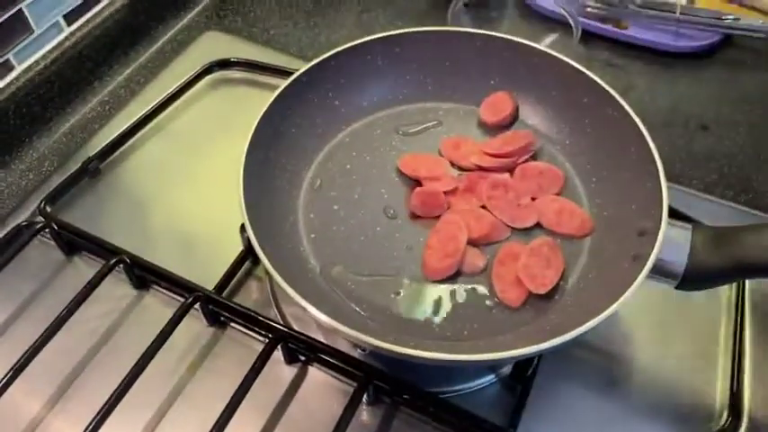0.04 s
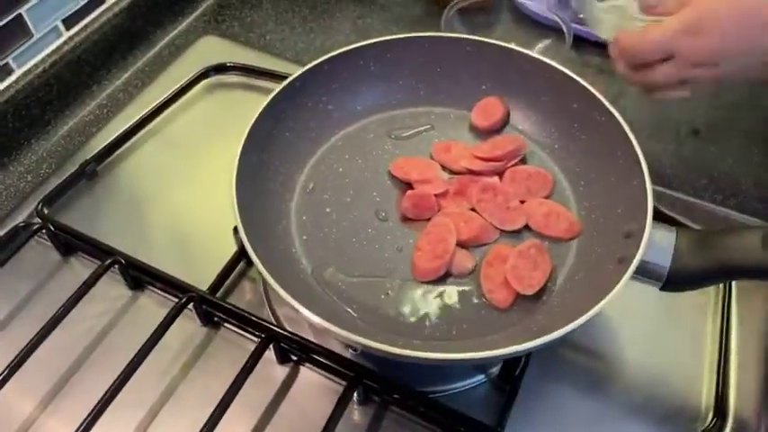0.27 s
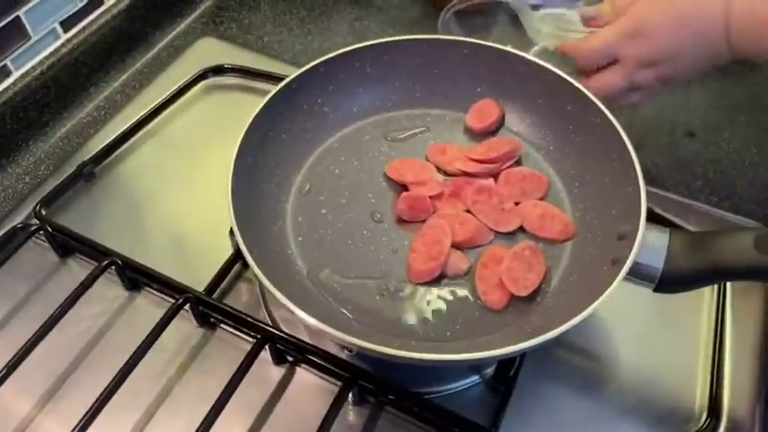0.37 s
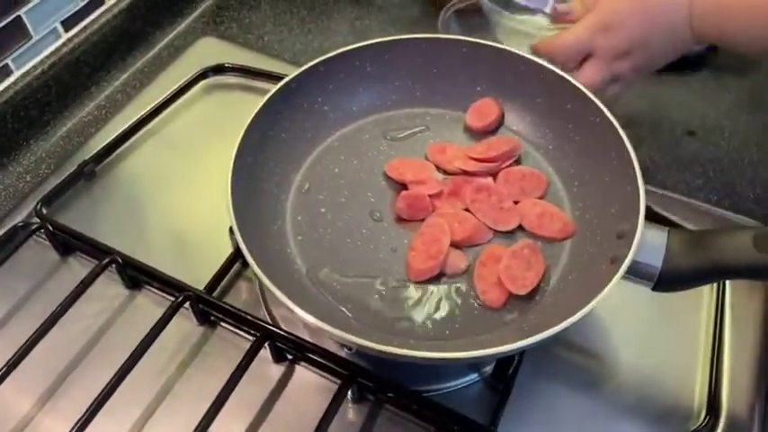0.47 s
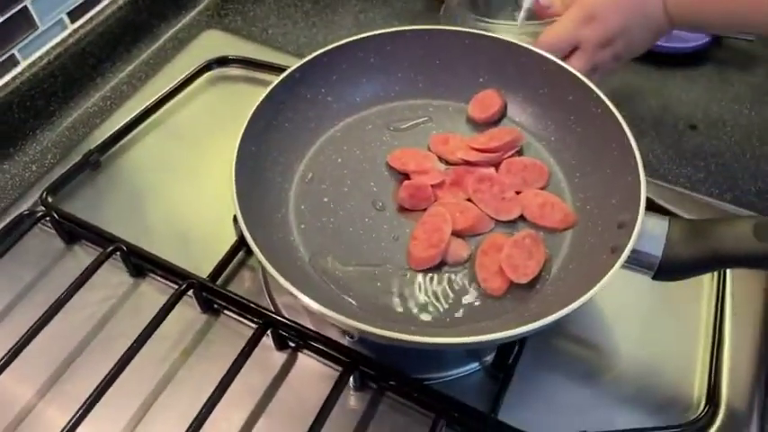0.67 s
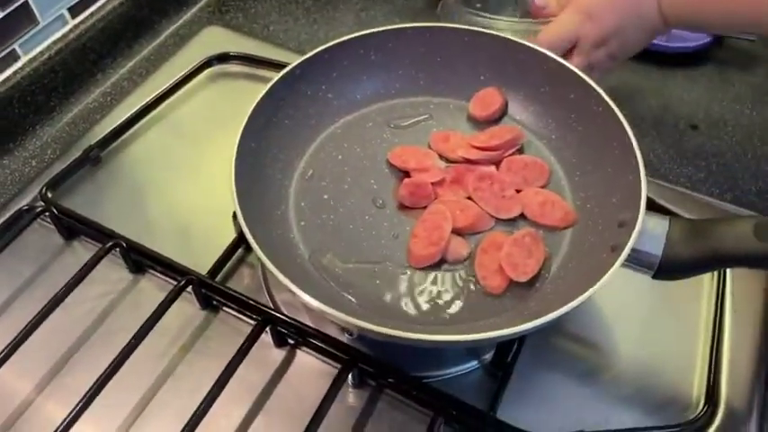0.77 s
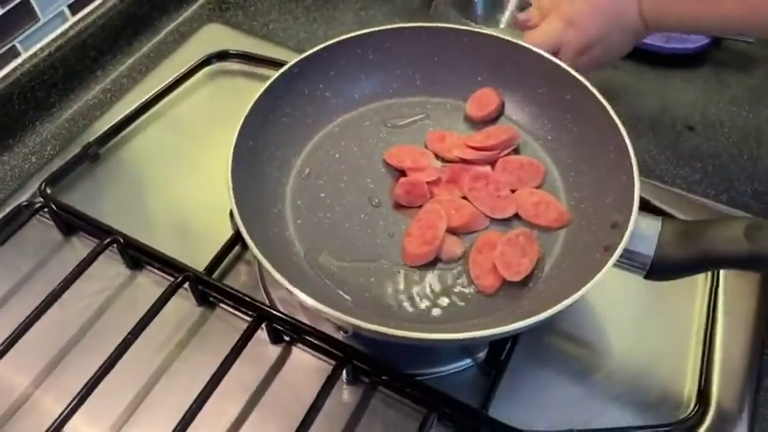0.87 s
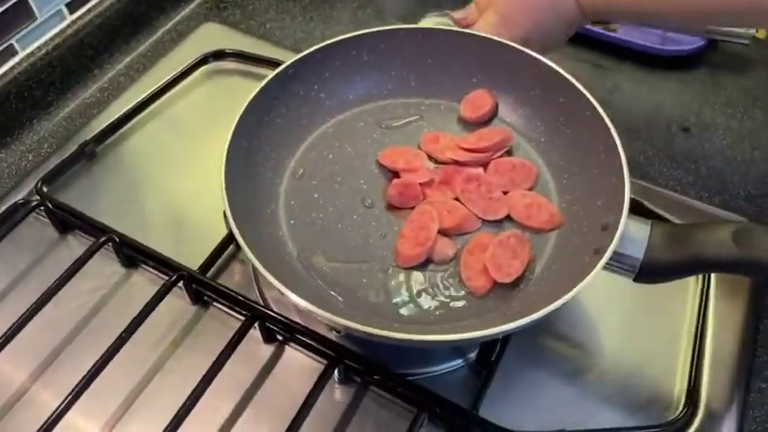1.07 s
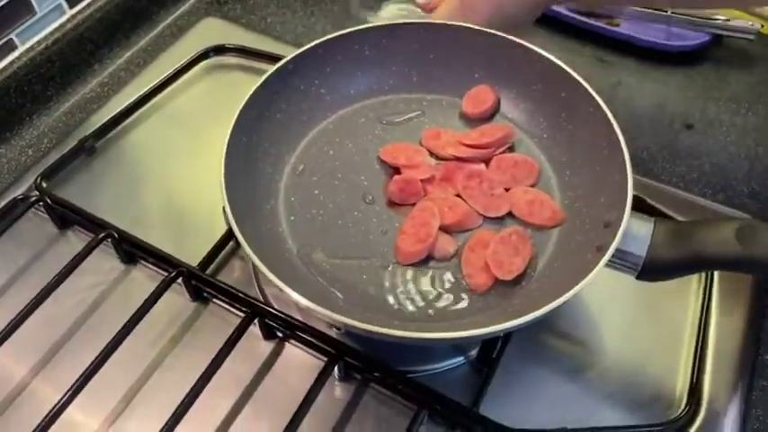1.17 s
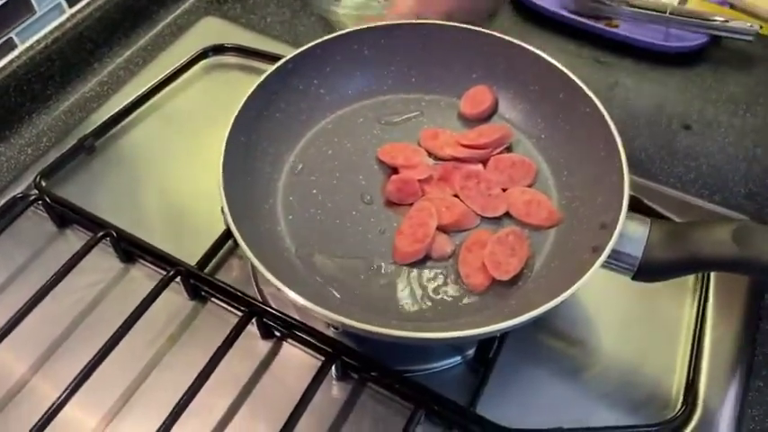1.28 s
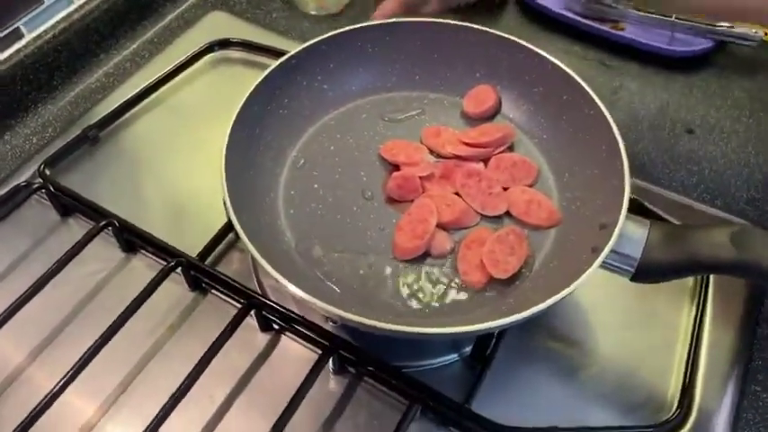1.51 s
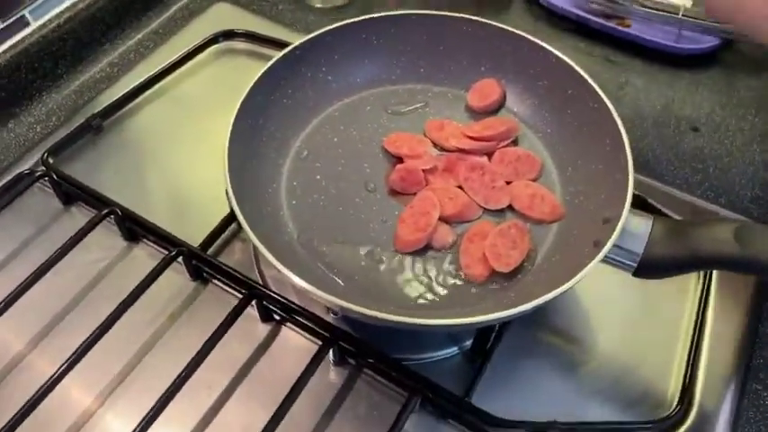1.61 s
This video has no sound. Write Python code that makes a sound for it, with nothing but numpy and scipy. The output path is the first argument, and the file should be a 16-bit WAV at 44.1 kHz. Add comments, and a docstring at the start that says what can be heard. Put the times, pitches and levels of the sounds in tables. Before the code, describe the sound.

Sausage slices sizzle in hot fat with sharp pops while glass bowls clink behind the pan

```python
"""Sizzling pan and glass bowls

Sausage slices sizzle in hot fat in a pan on a gas hob, close to a phone: random tiny bursts over a hiss.
Single drops pop, loud and faint, as clicks that ring for a moment, and steam spits in short swells of noise.
Behind the pan a hand stacks two small glass bowls: shaped noise makes the knocks, rattles and scrapes, and
fading sine waves make the glass ring. Steady noise and a wavering low tone make the kitchen's hum."""
import sys
import numpy as np
from scipy import signal
from scipy.fft import rfft, irfft
from scipy.io import wavfile
from scipy.ndimage import uniform_filter1d

SR = 44100
rng = np.random.default_rng(int(sys.argv[2]) if len(sys.argv) > 2 else 0)


def transcribe(u):
    """Save the signal u as a 16-bit wav file named by the first command-line argument.

    u: samples, shape (n,) or (channels, n), limited to [-1, 1]; the rate is SR.
    q: integer samples, one column per channel.
    """
    v = np.clip(np.atleast_2d(u).T, -1, 1)
    q = np.round(v * 32767).astype(np.int16)
    wavfile.write(sys.argv[1], SR, q)


def ratio(d):
    """dB to gain"""
    e = np.asarray(d, float) / 20
    return 10 ** e


N = 72765  # length in samples

# Loudness of the sizzle's treble before its flicker: start_s, level_db
SIZZLE_LEVEL = [(0.0, -30.5), (0.386, -29), (0.886, -30), (1.034, -33.5), (1.65, -32.5)]
# Tone of the sizzle: pitch_hz, relative level_db (per hertz)
SIZZLE_TONE = [(1060, -43), (1800, -17), (2640, -7), (3440, -2.5), (5960, 1), (6900, 0), (8200, -3.5),
               (9240, -2), (12400, -4), (16000, -9.5)]
# Centre pitches of the bubble bursts, small bubbles higher: pitch_hz
BUBBLE_PITCHES = [4500, 7000, 10000, 14000]
# Tone of the kitchen's steady noise: pitch_hz, relative level_db (per hertz)
KITCHEN_TONE = [(15, -40), (25, -9), (64, -21), (100, 2), (130, -16.5), (231, -10.5), (338, -21.5),
                (616, -13.5), (939, -5), (3000, -12.5), (3900, -44)]
# Loudness of a low rush at about 300-700 Hz: start_s, level_db
LOW_RUSH = [(0, -68), (1.15, -65), (1.4, -50), (1.65, -42)]
# Single pops of fat, loud and faint: start_s, relative level_db
FAT_POPS = [(.0077, -11), (.0948, -7), (.139, -12), (0.2611, -4.5), (0.3654, 1), (0.3832, -12), (0.47, -19),
            (0.5011, -2.5), (.535, -8), (.5674, -12), (0.6082, -7), (0.6177, 5), (0.6316, -15), (0.69, -11),
            (0.762, -1), (0.9698, -0.5), (1.1166, -17), (1.2036, -0.5), (1.2142, -33), (1.2382, -5),
            (1.288, -3), (1.3035, -38), (1.476, -22), (1.4932, -15), (1.5052, -17), (1.5185, -18),
            (1.5285, -12), (1.579, -8), (1.429, -13), (1.347, -7), (1.3667, -13), (.4428, -17),
            (.6625, -20), (.2218, -11), (0.1, -9)]
# Ringing of every pop: pitch_hz, width_hz, relative level_db
POP_RINGING = [(6170, 2970, 5), (8730, 3000, 3.5), (12000, 4600, -4)]
# Longer spits of steam: start_s, length_s, level_db, pitch_hz
STEAM_SPITS = [(0.02, 0.004, -18.5, 6400), (0.229, 0.019, -22.5, 12000), (0.963, 0.03, -24, 5000),
               (1.511, 0.021, -27.5, 4440)]
# Knocks of the bowls, and a faint touch (at 0.731 s) that damps the ringing:
# start_s, thud_db, dull_knock_db, bright_rattle_db, fade_s (by 60 dB),
# ring_share (of the free ringing time), ring_1_db, ring_2_db, ring_3_db, ring_4_db (one per overtone)
BOWL_TOUCHES = [(0.6991, -19.5, -4.5, -4, 0.054, 0.55, -38, -19, -14, -14.5),
                (.731, -52, -34, -38, 0.036, 0.71, -23, -50, -54, -42),
                (.7425, -45, -37, -32, .04, 0.88, -30, -45, -29, -40),
                (0.7543, -33.5, -16.5, -23, 0.015, 0.88, -22.5, -29.5, -47, -48),
                (.779, -26, -15.5, -39, 0.033, 0.78, -29.5, -49, -44, -36),
                (.88, -29.5, -10, 0.5, 0.055, 0.83, -31.5, -15.5, -13, -17.5),
                (1.0278, -24, -11.5, -4, 0.094, 1.0, -34, -12, -9, -10),
                (1.043, -24.5, -15.5, -12, 0.038, .8, -16, -10, -12.5, -17.5),
                (1.053, -63, -14, -13, 0.023, 0.39, -23, -15, -15, -18.5),
                (1.083, -59, -41, -19, 0.086, 0.89, -35, -26, -29, -28),
                (1.116, -50, -39, -20.5, 0.046, 0.61, -46, -35, -33, -27)]
# Scrapes and clatter of a bowl, without ringing:
# start_s, thud_db, dull_knock_db, bright_rattle_db, fade_s (by 60 dB)
SCRAPES = [(1.2027, -57, -37, -30, 0.071), (1.3332, -50, -21, -20.5, 0.1), (1.3815, -44, -27, -18, 0.057),
           (1.388, -32.5, -25, -16.5, 0.064), (1.495, -37, -31.5, -58, 0.095)]
# Tones of the three parts of a touch or scrape, each: pitch_hz, relative level_db (per hertz)
THUD_TONE = [(20, 11), (60, -16), (100, -9), (250, 5), (450, -3.5), (900, -17.5)]
DULL_TONE = [(300, -27.5), (550, -14.5), (760, -5), (930, -6.5), (1170, 1), (1400, -7), (1650, -4.5),
             (2000, -10.5), (3500, -12.5), (8000, -53)]
BRIGHT_TONE = [(1500, -35), (2300, -7), (2900, -5.5), (3450, -5), (3800, 1.5), (4300, -1.5), (4950, -7.5),
               (5600, 3.5), (6200, -1), (7400, -11.5), (8400, -4.5), (9800, -18.5), (12500, -10),
               (16000, -16)]
# Ringing tones of the glass in four groups, mostly close pairs:
# pitch_hz, relative level_db, free fade_s (by 60 dB)
GLASS_TONES = [
    [(1497, -1, .45), (1630, -4, .2)],
    [(3191, 0, .36), (3260, -8, .15), (2650, -13, .25)],
    [(5500, 2, .22), (5670, -6, .25), (5960, -8, .1)],
    [(8330, -4, .3), (8460, 0, .3), (12260, -14, .12)],
]


def set_rms(x, db):
    """Scale a sound so that its average strength (rms) is db."""
    return x * ratio(db) / np.sqrt(np.mean(x ** 2))


def colour(x, table):
    """Shape the tone of a sound along a table of pitch_hz and level_db."""
    hz = np.maximum(np.fft.rfftfreq(x.shape[-1], 1 / SR), 1)
    table_hz, table_db = np.array(table, float).T
    gain_db = np.interp(np.log(hz), np.log(table_hz), table_db)
    return irfft(rfft(x) * ratio(gain_db), x.shape[-1])


def band(x, hz, width_hz):
    """Keep mainly the pitches around hz."""
    edges = np.clip([hz - width_hz / 2, hz + width_hz / 2], 50, .45 * SR)
    return signal.sosfilt(signal.butter(1, edges, "band", fs=SR, output="sos"), x)


def walk(rate):
    """Wander smoothly between random values, with a new one rate times a second."""
    k = int(SR / rate)
    steps = rng.standard_normal(N)[np.arange(N) // k]
    return 1.19 * uniform_filter1d(uniform_filter1d(steps, k), k)


def fall(start, t60):
    """Start suddenly, then fade by 60 dB every t60 seconds."""
    t = np.arange(N) / SR - start
    return (t >= 0) * 1000. ** (-np.maximum(t, 0) / t60)


def level_over_time(table):
    """Join the points of start_s and level_db by straight lines."""
    return np.interp(np.arange(N) / SR, *np.array(table).T)


def sizzle():
    """Tiny bubbles of several sizes burst at random over a hiss; the whole flickers."""
    bursts_per_s, burst_spread_db, burst_top_db = 3000, 3.2, 12
    hiss_db, side_db = 1.5, -26  # hiss against the bursts; side noise before the mix is scaled
    flicker_db, flickers_per_s = 1.2, 40.04
    when, size, sign = rng.random((3, len(BUBBLE_PITCHES), N))
    # most bursts are small, a few are large
    size_db = np.minimum(-burst_spread_db * np.log(size + 1e-9), burst_top_db)
    happens = when < bursts_per_s / len(BUBBLE_PITCHES) / SR
    clicks = happens * np.sign(sign - .5) * ratio(size_db)
    bursts = sum(band(c, hz, 0.72 * hz) for c, hz in zip(clicks, BUBBLE_PITCHES))
    hiss, side = rng.standard_normal((2, N))
    mid = set_rms(bursts, 0) + ratio(hiss_db) * hiss
    fizz = colour(mid + ratio(side_db) * side * np.array([[1], [-1]]), SIZZLE_TONE)
    fizz = fizz / np.std(band(fizz, 10940, 6900))  # the treble sets the loudness
    return fizz * ratio(level_over_time(SIZZLE_LEVEL) + flicker_db * walk(flickers_per_s))


def kitchen():
    """Gas flame and appliances: a steady noise, a low rush that changes level and a wavering mains hum."""
    noise_db, side_db = -39.5, -24  # side_db is against the middle
    hum_hz, hum_db, waver_db = 100, -57, 5
    mid, side = set_rms(colour(rng.standard_normal((2, N)), KITCHEN_TONE), noise_db)
    hum_level = np.sqrt(2) * ratio(hum_db + waver_db * walk(4))
    hum = hum_level * np.sin(2 * np.pi * hum_hz * np.arange(N) / SR)
    rush = set_rms(band(rng.standard_normal(N), 500, 400), 0) * ratio(level_over_time(LOW_RUSH))
    return mid + rush + hum + ratio(side_db) * side * np.array([[1], [-1]])


def pops():
    """Each pop is a click that rings for a few cycles and leaves a short spray of noise."""
    spray_db, spray_t60_s = -21.5, .03  # spray_db is added to the pop's own level
    clicks, spray = np.zeros(N), np.zeros(N)
    for start, db in FAT_POPS:
        clicks[int(start * SR)] -= ratio(db)
        spray += ratio(db + spray_db) * fall(start, spray_t60_s)
    push = clicks * 2 + spray * rng.standard_normal(N)
    return sum(ratio(db) * band(band(push, hz, 2 * width), hz, width) for hz, width, db in POP_RINGING)


def spits():
    """Steam escapes in short swells of hiss."""
    t, noise = np.arange(N) / SR, rng.standard_normal(N)
    out = np.zeros(N)
    for start, length, db, hz in STEAM_SPITS:
        half = length / 2
        swell = np.exp(-((t - start - half) / half) ** 2)
        out += set_rms(band(noise, hz, 0.78 * hz), db) * swell
    return out


def knocks_and_scrapes():
    """Fading bursts of rough noise: thuds, dull knocks and rattles of quick bounces (mid, side)."""
    bounces_per_s, bounce_db = 600, 2.5
    rough = ratio(bounce_db * walk(bounces_per_s))
    parts = np.array([set_rms(colour(rng.standard_normal((2, N)) * rough, tone), 0)
                      for tone in (THUD_TONE, DULL_TONE, BRIGHT_TONE)])
    out = np.zeros((2, N))
    for start, *part_db, t60 in [row[:5] for row in BOWL_TOUCHES] + SCRAPES:
        out += fall(start, t60) * np.tensordot(ratio(part_db), parts, axes=1)
    return out


def worktop():
    """At each touch of the bowls the worktop sounds a low tone that fades."""
    hz, tone_db, t60_s = 98.1, -14.5, 0.66  # tone_db is added to the touch's thud_db
    t = np.arange(N) / SR
    return sum(ratio(thud_db + tone_db) * fall(start, t60_s) * np.sin(2 * np.pi * hz * (t - start))
               for start, thud_db, *_ in BOWL_TOUCHES)


def glass_ring():
    """The glass rings unevenly in several tones until the next touch stops it (mid, side)."""
    touch_t60_s, chatter_per_s, chatter_db = 0.0059, 150, 3.5
    t = np.arange(N) / SR
    # each ring is free until the next touch, then fades quickly; the last stays free
    free = [np.where(t < row[0], 1, fall(row[0], touch_t60_s)) for row in BOWL_TOUCHES[1:]] + [1]
    out = np.zeros((2, N))
    for overtone, tones in enumerate(GLASS_TONES):
        for hz, db, t60 in tones:
            swing = 0
            for row, undamped in zip(BOWL_TOUCHES, free):
                start, share, ring_db = row[0], row[5], row[6 + overtone]
                from_zero = np.exp(-2j * np.pi * hz * start)  # the mid wave starts at zero
                swing = swing + ratio(ring_db) * fall(start, t60 * share) * undamped * from_zero
            # the side wave gets a random phase
            turn = np.exp(2j * np.pi * (hz * t + np.array([[0], [1]]) * rng.random()))
            uneven = ratio(db + chatter_db * walk(chatter_per_s))
            out += (uneven * swing * turn).imag
    return out


def bowls():
    """Touching bowls knock, scrape, shake the worktop and ring (mid, and a weaker side)."""
    side_db = -16
    return (knocks_and_scrapes() + worktop() + glass_ring()) * ratio(np.array([[0], [side_db]]))


def room(x):
    """Tiled walls answer with a short fading tail, slightly different at each side."""
    tail_db, t60_s, delay_s, side_db = -13, 0.32, 0.0042, -24
    tail = rng.standard_normal((2, N)) * fall(delay_s, t60_s)
    tail = signal.lfilter(*signal.butter(1, [300, 5000], "band", fs=SR), tail)
    tail = tail / np.sqrt((tail ** 2).sum(axis=1, keepdims=True)) * ratio(np.array([[0], [side_db]]))
    mid, side = signal.fftconvolve(tail, x[None], axes=1)[:, :N] * ratio(tail_db)
    return np.array([mid + side, mid - side])


def scene():
    """Pan in front, bowls turned up slightly on the right, kitchen around."""
    right_over_left_db = 1.2
    mid, side = bowls()
    balance = ratio(np.array([[-right_over_left_db], [right_over_left_db]]) / 2)
    glass = np.array([mid + side, mid - side]) * balance
    return sizzle() + pops() + spits() + glass + room(mid) + kitchen()


def band_limit(x):
    """A steep low-pass at the top of the band."""
    return signal.sosfilt(signal.butter(12, 16130, fs=SR, output="sos"), x)


def record(dry):
    """The phone squeezes loud peaks towards full scale and cuts the top above 16 kHz."""
    sharpness = 3.07  # higher bends more abruptly
    x = dry / (1 + np.abs(dry) ** sharpness) ** (1 / sharpness)
    x = signal.sosfilt(signal.ellip(8, .2, 70, 16000, fs=SR, output="sos"), x)
    return band_limit(np.clip(x, -1, 1))


dry = scene()
out = record(dry)
transcribe(out)
```